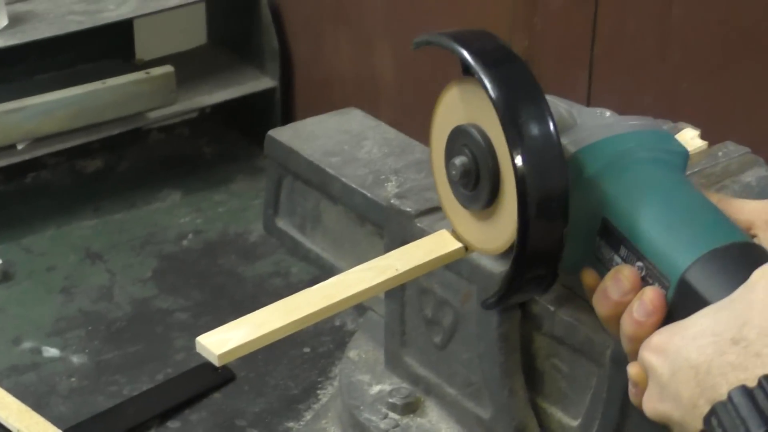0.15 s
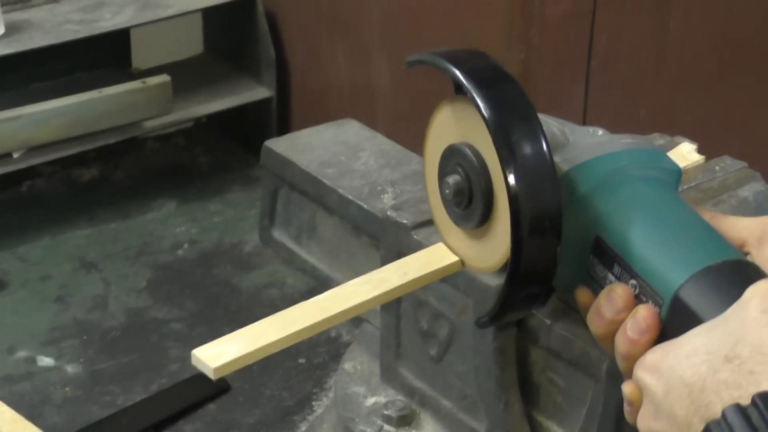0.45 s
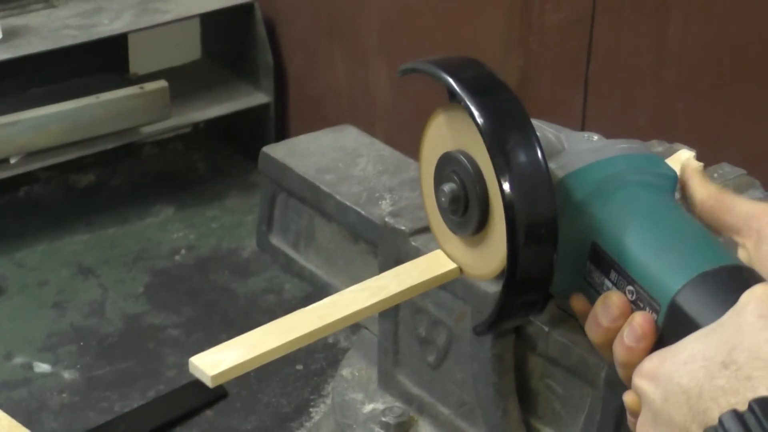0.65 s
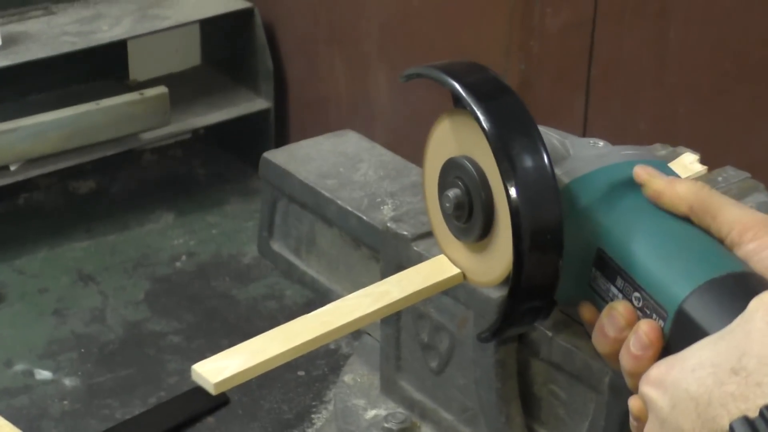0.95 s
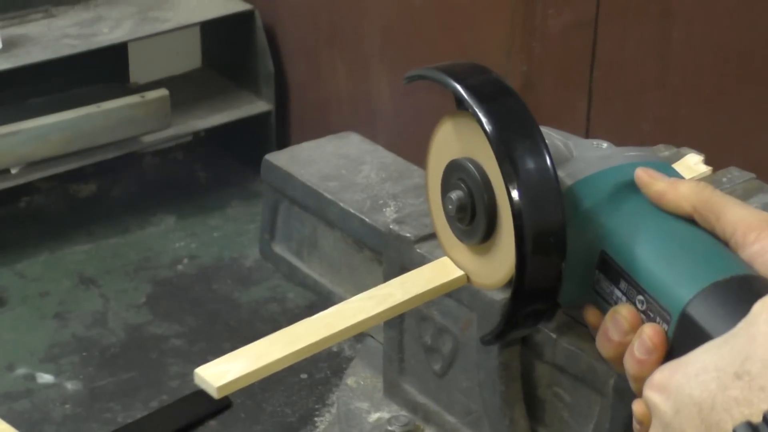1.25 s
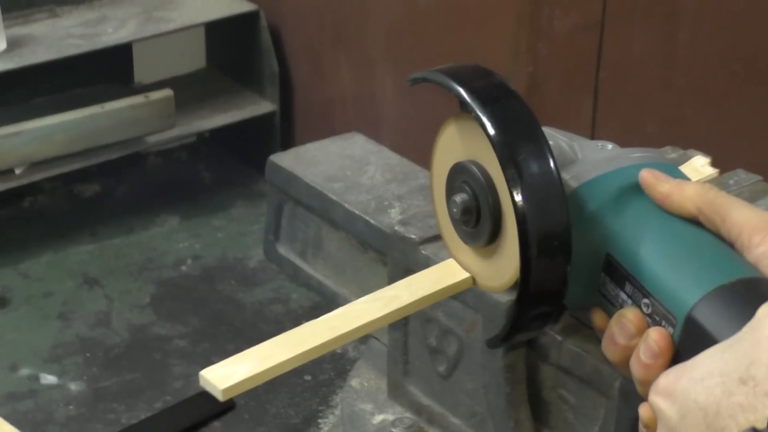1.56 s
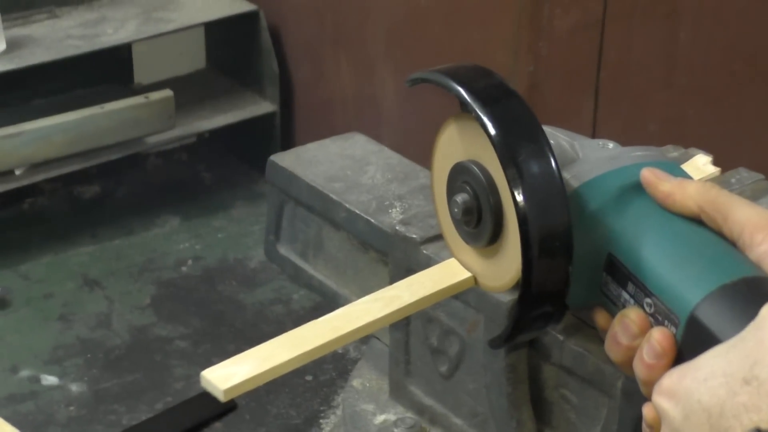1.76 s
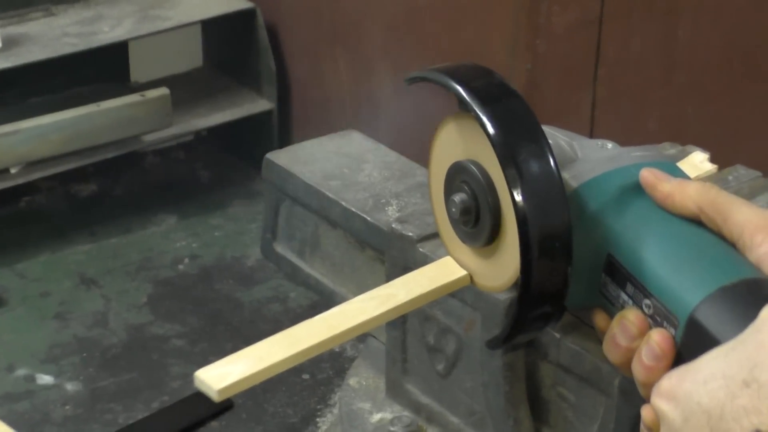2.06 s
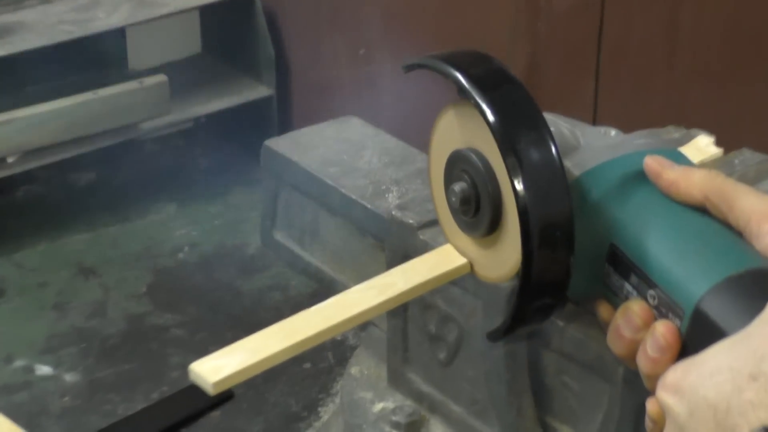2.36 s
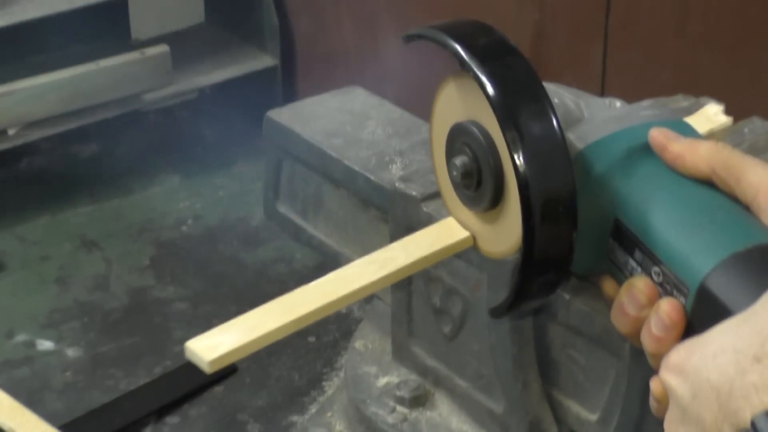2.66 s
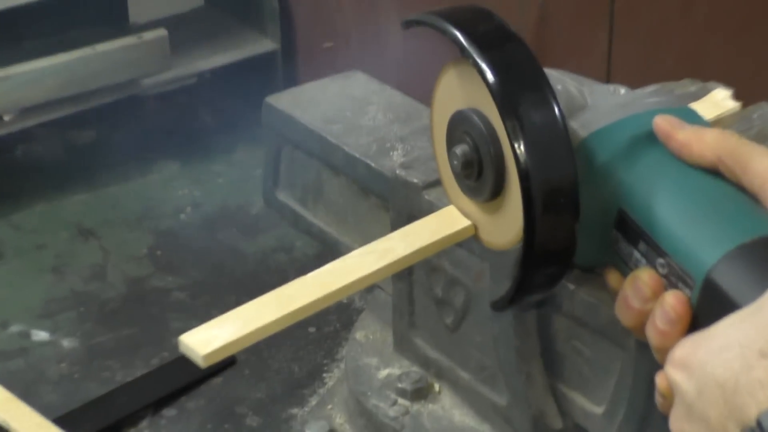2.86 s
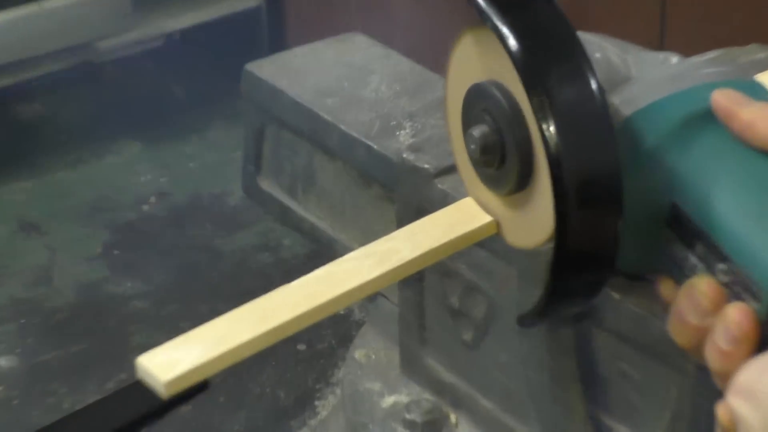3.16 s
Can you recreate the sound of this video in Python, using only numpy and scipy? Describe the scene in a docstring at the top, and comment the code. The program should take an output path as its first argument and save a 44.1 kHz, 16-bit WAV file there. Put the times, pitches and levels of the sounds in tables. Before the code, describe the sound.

An angle grinder, already near full speed, rubs a thin wooden strip, close and slightly right. A hard buzzing touch at 0.12 s, a dip around 0.2 s, then a brighter loud hiss from 0.28 s. From 0.5 s the rough buzz and motor and gear whine sag in pitch until about 2.5 s, with ringing and brief squeals. Three tiny splinter cracks at 2.97 s; speed rises slightly by 3.3 s.

```python
"""An angle grinder with a cardboard disc rubs through a thin wooden strip in a workshop.
It starts near full speed with a hard touch; the level dips briefly, then the sound returns brighter.
From half a second on the load drags the harsh once-a-turn buzz, motor and gear whine down in pitch,
while disc and strip ring at multiples of the turn rate and squeal by stick-slip.
Near three seconds three splinters snap off; then the speed recovers a little."""
import sys
import numpy as np
from scipy import signal
from scipy.fft import rfft, irfft, next_fast_len
from scipy.io import wavfile
from scipy.ndimage import uniform_filter1d, map_coordinates

SR = 44100
rng = np.random.default_rng(int(sys.argv[2]) if len(sys.argv) > 2 else 0)


def master(y):
    """Save y as 16-bit WAV."""
    cut = np.clip(np.atleast_2d(y).T, -1, 1)
    pcm = np.round(cut * 32767)  # scale
    wavfile.write(sys.argv[1], SR, pcm.astype(np.int16))


N = 145530
TOP_HZ = 15800  # band limit


def amp(db):
    """Decibels to gain."""
    return 10 ** (np.asarray(db) / 20)


def unit(x):
    """Scale to rms 1."""
    return x / np.sqrt(np.mean(x ** 2) + 1e-20)


def along(points, hz):
    """Interpolate (frequency [Hz], value) points on a log frequency axis."""
    f, v = np.transpose(points)
    return np.interp(np.log(hz + 1), np.log(f + 1), v)


def curves(rows):
    """One value per sample for each column after the time."""
    s, *cols = np.transpose(rows)
    return [np.interp(np.arange(N) / SR, s, c) for c in cols]


def wobble(knots_per_s):
    """A smooth random curve through normally distributed knots."""
    coarse = np.linspace(0, N, 1024)
    knots = rng.standard_normal(512)
    curve = map_coordinates(knots, [coarse * knots_per_s / SR], mode="wrap")
    return np.interp(np.arange(N), coarse, curve)


def filtered(x, response):
    """Multiply the spectrum of x by a response of frequency."""
    m = next_fast_len(N + SR // 4)
    return irfft(rfft(x, m) * response(np.fft.rfftfreq(m, 1 / SR)), m)[..., :N]


def gate(start_s, end_s, fade_s):
    """Fade in, hold, fade out; half height at start and end."""
    t = np.arange(N) / SR
    return np.clip(np.minimum(t - start_s, end_s - t) / fade_s + .5, 0, 1)


def tone(cycles, waver_depth):
    """A unit-rms line that wavers in level, a little differently at each ear."""
    per_ear = np.array([wobble(14), wobble(14)])
    waver_db = waver_depth * (0.99 * wobble(5.44) + 0.76 * wobble(25.92) + 0.48 * per_ear)
    return unit(amp(waver_db) * np.sin(2 * np.pi * (cycles + rng.random())))


# echo over direct sound: (frequency [Hz], level [dB])
ECHO_SHARE = [(1000, -8), (4000, -3.5), (7000, -4.5), (12000, -1)]
ECHO_T60_S, ECHO_REMIX_PER_S = 0.19, 3.996  # decay; how fast the random echo tails are mixed anew


def room(pair):
    """Remixed random echo tails smear gliding lines and make them flicker, most of all in the treble."""
    t = np.arange(SR // 4) / SR
    tails = rng.standard_normal((4, 2, len(t))) * amp(-60 * t / ECHO_T60_S)
    weights = np.array([wobble(ECHO_REMIX_PER_S) for _ in tails])
    weights = weights / np.linalg.norm(weights, axis=0)
    echo = 0
    for weight, tail in zip(weights, tails):
        tail = tail / np.linalg.norm(tail[0])
        echo = echo + weight * signal.fftconvolve(pair, tail, axes=1)[:, :N]
    share = lambda hz: amp(along(ECHO_SHARE, hz))
    return filtered(pair + filtered(echo, share), lambda hz: 1 / np.hypot(1, share(hz)))


# left-right likeness: (frequency [Hz], likeness [0-1])
LIKENESS = [(60, 0.4), (92, 0.66), (140, 0.8), (210, 0.75), (330, 0.61), (500, 0.51), (770, 0.93),
            (1170, 0.58), (1790, 0.68), (2740, 0.52), (4190, 0.38), (6410, 0.26), (9810, 1), (15000, 0.97)]


def spread(pair):
    """Two unrelated signals become left and right, as alike as LIKENESS says at each frequency."""
    angle = lambda hz: np.arccos(np.clip(along(LIKENESS, hz), 0, .99)) / 2
    mid, side = filtered(pair, lambda hz: np.array([np.ones_like(hz), np.tan(angle(hz))]))
    return np.array([mid + side, mid - side])


# cooling-air spectrum: (frequency [Hz], relative level [dB])
AIR_COLOUR = [(20, -7), (60, -3), (130, 3), (200, 0), (330, 5), (500, -2.5), (750, 6.5), (1000, -1),
              (2000, -40)]
# cooling-air rumble: (time [s], level [dB])
AIR_LEVEL = [(0, -51), (.1, -50.5), (.15, -67), (.22, -67), (.26, -57), (.35, -60), (.62, -59.5), (.8, -57),
             (2.05, -57), (2.4, -59.5), (3.3, -59.5)]


def air():
    """Low rumble of the cooling air: coloured noise."""
    rumble = filtered(rng.standard_normal((2, N)), lambda hz: amp(along(AIR_COLOUR, hz)))
    return amp(curves(AIR_LEVEL)[0]) * unit(rumble)


# motor whine, multiple 10 is the gear mesh:
# (multiple of rotor speed, level running free [dB], level under full load [dB])
MOTOR_LINES = [(1, -66.5, -55.5), (2, -54, -66), (3, -67, -48), (4, -42, -51), (5, -56, -48.5),
               (6, -51, -44.5), (7, -44, -45.5), (9, -51, -42), (10, -61, -44.5), (11, -54, -49),
               (12, -46, -50)]
GEAR_RATIO = 3.7  # rotor turns per disc turn
FREE_HZ, LOADED_HZ = 150, 121  # disc speed at zero and full load
MOTOR_WAVER_DEPTH = 3


def motor(turns, speed_hz):
    """Rotor, fan and gear lines change level as the load drags the speed down."""
    load = (FREE_HZ - speed_hz) / (FREE_HZ - LOADED_HZ)
    whine = 0
    for k, free_db, loaded_db in MOTOR_LINES:
        level_db = free_db + load * (loaded_db - free_db)
        whine = whine + amp(level_db) * tone(k * GEAR_RATIO * turns, MOTOR_WAVER_DEPTH)
    return whine


# splinter onsets: (time [s], level [dB])
SNAPS = [(2.965, -15), (2.97, -14.5), (2.974, -16)]
# splinter spectrum: (frequency [Hz], relative level [dB])
SNAP_COLOUR = [(200, -45), (800, -40), (3000, -5), (8000, 4), (12000, 5.5), (16000, -10)]
SNAP_T60_S = 0.02


def splinters():
    """Short bright cracks as the wood gives way: decaying coloured noise."""
    t = np.arange(N) / SR
    level = sum((t >= s) * amp(db - 60 * np.abs(t - s) / SNAP_T60_S) for s, db in SNAPS)
    crack = filtered(rng.standard_normal((2, N)), lambda hz: amp(along(SNAP_COLOUR, hz)))
    return level * unit(crack)


# lines that ring out in the cut: (start [s], end [s], multiple of turn rate, level [dB])
RINGS = [(0.714, 1.1, 1, -56.5), (1.1, 1.76, 1, -58.5), (0.925, 2.15, 2, -57.5), (2.14, 3.1, 2, -64.5),
         (1.07, 2.9, 5, -55.5), (2.25, 3.3, 5, -51.5), (0.67, 1.06, 9, -41), (1.95, 4, 9, -48),
         (0.73, 2.5, 10, -44.5), (2.6, 2.97, 10, -44.5), (1.66, 2.0, 11, -41), (2.0, 2.97, 11, -42),
         (1.19, 2.1, 8, -52), (0.51, 0.9, 12, -41.5), (1.9, 3.9, 12, -45.5), (0.64, 1.08, 14, -44),
         (0.41, 1.06, 15, -39), (3.2, 3.3, 16, -41.5), (2.97, 3.3, 8, -50.5), (1.04, 2.14, 17, -41),
         (1.07, 2.08, 18, -41), (1.02, 2.12, 19, -42), (.55, 2.3, 21, -37.5), (.11, .2, 27, -29),
         (.5, 2.2, 29, -40), (1, 1.6, 31, -38), (2.7, 4.7, 31, -36), (1.08, 1.8, 32, -39),
         (0.088, 0.205, 33, -33.5), (1.1, 2.2, 33, -38), (2.28, 3.6, 33, -34.5), (2.25, 2.58, 34, -32.5),
         (2.1, 2.95, 34, -34.5), (2.3, 3.3, 35, -34), (0.95, 2, 37, -40.5), (2.6, 3.2, 46, -36.5)]
RING_FADE_S, HUM_FADE_S = 0.027, 0.13  # hum part is divided by the multiple
RING_WAVER_DEPTH, HUM_WAVER_DEPTH = 2.17, 1.3  # likewise


def rings(turns):
    """Disc and strip sing at single multiples of the turn rate; the lowest are slowest and least steady."""
    ringing = 0
    for start_s, end_s, k, db in RINGS:
        on = gate(start_s, end_s, RING_FADE_S + HUM_FADE_S / k)
        line = tone(k * turns, RING_WAVER_DEPTH + HUM_WAVER_DEPTH / k)
        ringing = ringing + amp(db) * on * line
    return ringing


WEAR_PER_S = 5.003  # renewals of the rim profile


def rim(turns, size, channels=2):
    """A random profile of equally strong ripples round the rim, read once a turn and worn into new ones."""
    ripples = np.exp(2j * np.pi * rng.random((32, channels, size // 2))) * (np.arange(size // 2) > 0)
    shapes = irfft(ripples, size * 8, axis=2)
    points = shapes.shape[2]
    age = np.arange(N) / SR * WEAR_PER_S
    old = age.astype(int) % (len(shapes) - 1)
    blend = age % 1 * np.pi / 2
    spot = turns % 1 * points
    i, part = spot.astype(int), spot % 1
    read = lambda k: shapes[k, :, i].T * (1 - part) + shapes[k, :, (i + 1) % points].T * part
    return unit(read(old) * np.cos(blend) + read(old + 1) * np.sin(blend))


# stick-slip squeals: (start [s], end [s], centre [Hz], width of each filter pass [Hz], level [dB])
SQUEALS = [(.105, 0.15, 4320, 900, -26.5), (0.282, .41, 9980, 500, -26), (0.287, .41, 9280, 130, -30),
           (0.423, .53, 9450, 600, -27.5), (.42, 0.476, 5200, 200, -34), (0.526, 0.598, 4880, 150, -29.5),
           (0.544, .65, 3085, 180, -35), (.6, .7, 4340, 200, -34.5), (0.824, 0.913, 2060, 205, -32.5),
           (.85, 1.006, 2915, 250, -34), (0.793, 1.106, 4120, 450, -32), (0.895, 1.08, 5100, 250, -35.5),
           (1.1, 1.495, 4150, 706, -31.5), (1.12, 1.57, 2560, 596, -36.5), (1.15, 1.27, 9550, 500, -29.5),
           (1.195, 1.58, 9220, 400, -32), (1.874, 2.057, 2390, 456, -35), (2.279, 2.36, 8040, 300, -34),
           (2.3, 2.556, 4130, 201, -32), (2.6, 2.764, 9700, 350, -34.5), (2.765, 2.94, 6070, 250, -38),
           (2.8, 2.95, 12900, 700, -35), (3.118, 3.218, 4260, 200, -33), (3.209, 3.33, 4540, 300, -35)]
CATCH_DB = 1  # swell once a turn
STEADY_S, SQUEAL_FADE_S = 0.046, .025  # level-holding window; fade


def squeals(turns):
    """The disc catches once a turn and kicks a resonance of the strip."""
    kick = rim(turns, size=264) + 0.29 * rng.standard_normal((2, N))
    catch = amp(CATCH_DB * np.cos(2 * np.pi * turns)) * kick
    out, t = np.zeros((2, N)), np.arange(N) / SR
    for start_s, end_s, centre_hz, width_hz, db in SQUEALS:
        on = gate(start_s, end_s, SQUEAL_FADE_S)
        near = (t > start_s - .1) & (t < end_s + .1)
        b, a = signal.iirpeak(centre_hz, centre_hz / width_hz, SR)
        ring = signal.lfilter(b, a, signal.lfilter(b, a, catch[:, near]))
        power = uniform_filter1d(np.mean(ring ** 2, axis=0), int(STEADY_S * SR))
        out[:, near] += amp(db) * on[near] * ring / np.sqrt(np.abs(power) + 1e-12)
    return out


# rubbing before trim: (time [s], low-band level [dB], mid-band level [dB], high-band level [dB])
RUB_LEVELS = [(0.0, -29, -25.5, -25.5), (0.095, -28.5, -26.5, -25), (0.12, -24.5, -20.3, -20),
              (0.17, -29, -27, -23.5), (0.215, -35, -31.7, -31), (0.265, -26.5, -27.2, -25.5),
              (0.285, -27.5, -25.0, -17.5), (0.33, -29.5, -27.1, -20.5), (0.41, -30, -27.5, -22),
              (0.48, -28.5, -25.5, -20.5), (0.62, -29.5, -25, -23), (0.78, -30, -26.5, -23),
              (0.95, -29, -26, -22.5), (1.08, -31, -26, -24), (1.16, -33, -30, -26),
              (1.22, -31.5, -28.5, -24.5), (1.6, -32.5, -28.5, -25), (1.872, -29.5, -28, -23.5),
              (2.03, -28.5, -25.5, -21), (2.3, -31, -27, -23.5), (2.6, -31.5, -28.5, -26),
              (2.85, -31.5, -28, -23), (3.05, -31, -28.5, -24.5), (3.3, -29.5, -27.5, -25.4)]
# band edges: (low to mid [Hz], mid to high [Hz])
SPLIT_HZ = (3200, 7000)
# part that repeats from turn to turn: (time [s], buzz over hiss [dB])
BUZZ_OVER_HISS = [(0, -1), (.09, -6), (.13, 10), (.23, -3), (.32, 2.5), (.9, 6.5), (1.4, 3.5), (1.7, 2.5),
                  (2.05, 3.5), (2.5, 5), (2.9, 3), (3.0, 1), (3.3, 9.5)]
# buzz spectrum: (frequency [Hz], relative level [dB])
BUZZ_COLOUR = [(120, -45), (400, -29), (800, -21.5), (1050, -13), (1400, -9.5), (1700, -9.5), (2200, -5.5),
               (3000, -5.5), (4200, -4.5), (5200, -6), (6300, -9), (7700, -1), (8400, -2), (9900, 0.5),
               (11000, -2), (12500, -1.5), (13600, -4), (15500, -5.5)]
# hiss spectrum: (frequency [Hz], relative level [dB])
HISS_COLOUR = [(100, -41), (200, -45), (330, -25), (450, -28), (650, -21.5), (830, -21.5), (1050, -9),
               (1600, -10.5), (2200, -4.5), (3200, -3), (4300, -4.5), (5200, -6.5), (6300, -8.5),
               (8000, -6), (9900, -1.5), (11500, -3.5), (13500, -10), (15500, -12)]
RUB_TRIM_DB = -1.19
BUZZ_LUMPS_DB, HISS_LUMPS_DB = 1.66, 0.33  # rms swell at the rim's high spots
SLIP_TURNS, SLIP_PER_S = 0.0009, 70  # the point of contact dances on the rim
CHATTER_DB, CHATTER_PER_S = 0.3, 24  # uneven hand pressure


def rubbing(turns):
    """The rim's grain repeats as a buzz, torn fibres hiss; both swell at the rim's high spots."""
    lumps = rim(turns, size=14, channels=1)
    grain = rim(turns + SLIP_TURNS * wobble(SLIP_PER_S), size=264)
    scrape = room(grain * amp(BUZZ_LUMPS_DB * lumps))
    buzz = filtered(scrape, lambda hz: amp(along(BUZZ_COLOUR, hz)))
    tearing = rng.standard_normal((2, N)) * amp(HISS_LUMPS_DB * lumps)
    hiss = filtered(tearing, lambda hz: amp(along(HISS_COLOUR, hz)) * (hz < TOP_HZ))
    ratio = amp(curves(BUZZ_OVER_HISS)[0])
    rub = (ratio * unit(buzz) + unit(hiss)) / np.sqrt(1 + ratio ** 2)
    edges_hz = [0, *SPLIT_HZ, TOP_HZ]
    total = 0
    for lo, hi, db in zip(edges_hz, edges_hz[1:], curves(RUB_LEVELS)):
        band = unit(filtered(rub, lambda hz: (hz >= lo) & (hz < hi)))
        total = total + band * amp(db + CHATTER_DB * wobble(CHATTER_PER_S))
    return amp(RUB_TRIM_DB) * total


# disc speed before flutter: (time [s], turn rate [Hz])
DISC_SPEED = [(0.12, 146.7), (0.24, 147.3), (0.28, 149.5), (0.47, 149.5), (0.55, 148.3), (0.93, 139.6),
              (1.1, 134.1), (1.2, 133.0), (1.72, 131.3), (1.95, 133.5), (2.01, 132.8), (2.16, 126.1),
              (2.26, 123.0), (2.36, 121.5), (2.49, 120.8), (2.64, 122.2), (3.09, 120.8), (3.12, 121.1),
              (3.3, 125.0)]
# stereo balance: (frequency [Hz], left minus right [dB])
LEAN = [(60, 4), (99, -2.5), (160, -1.5), (270, -6.5), (450, -6), (740, -7.5), (1220, -5.5), (2010, -2.5),
        (3330, -4), (5500, -11.5), (9080, -6.5), (15000, -4)]
FLUTTER, FLUTTER_PER_S = 0.000656, 40.2  # fraction of speed; knots per second


def scene():
    """One shaft drives everything; the grinder is right of centre."""
    speed_hz, = curves(DISC_SPEED)
    turns = np.cumsum(speed_hz * (1 + FLUTTER * wobble(FLUTTER_PER_S))) / SR
    noises = spread(air() + splinters() + squeals(turns) + rubbing(turns))
    sound = noises + motor(turns, speed_hz) + rings(turns)
    sides = lambda hz: np.array([amp(along(LEAN, hz)), np.ones_like(hz)])
    return filtered(sound, lambda hz: sides(hz) / sides(hz).mean(axis=0))


def record(dry):
    """Nothing passes above the band limit."""
    return filtered(dry, lambda hz: hz < TOP_HZ)


dry = scene()
out = record(dry)
master(out)
```